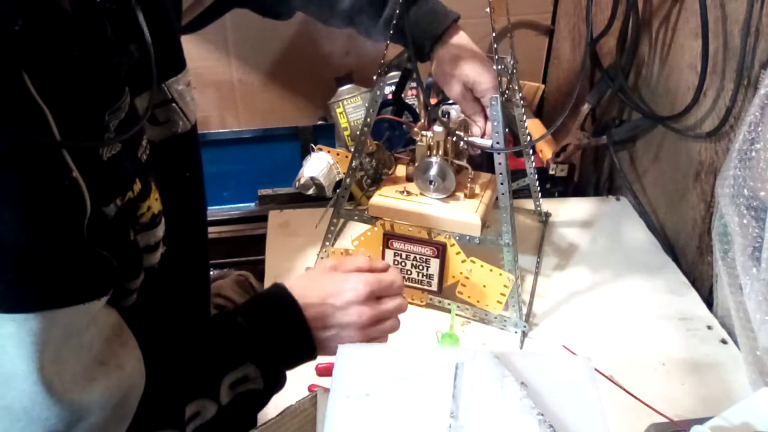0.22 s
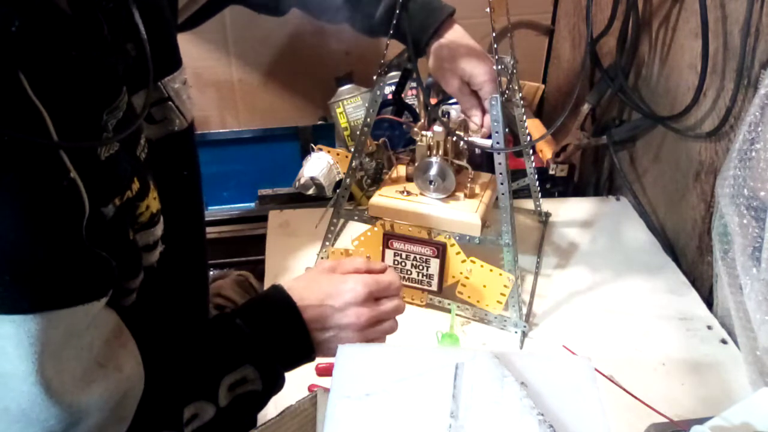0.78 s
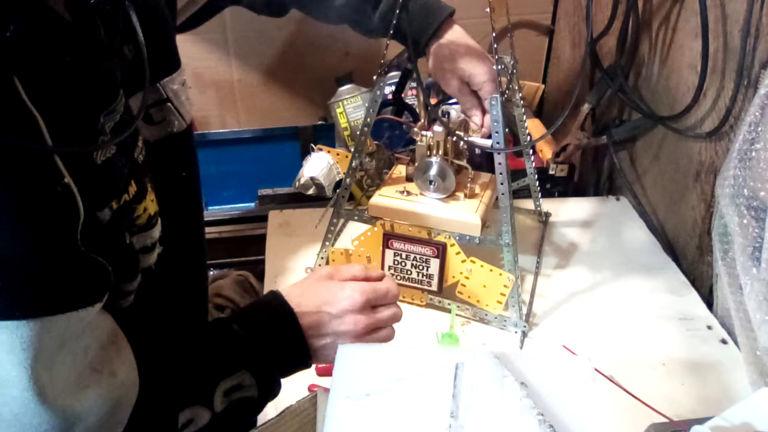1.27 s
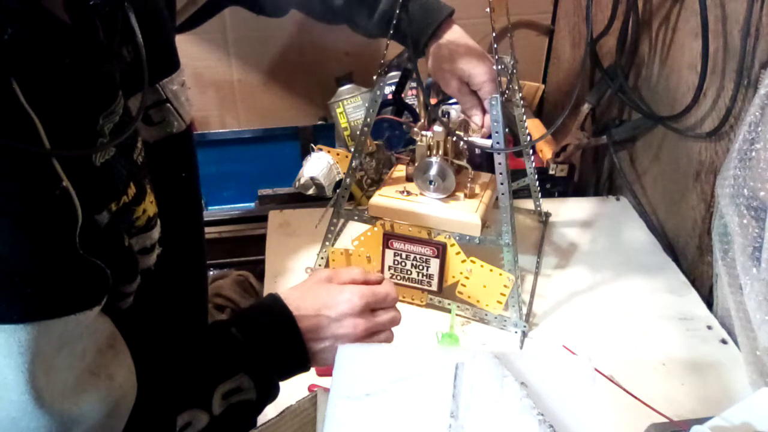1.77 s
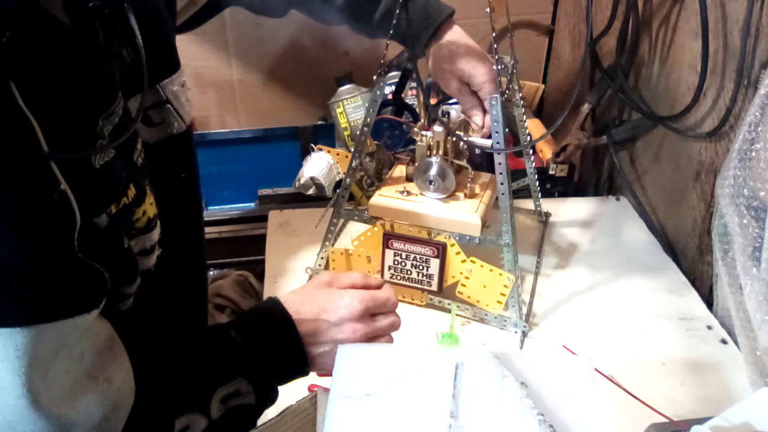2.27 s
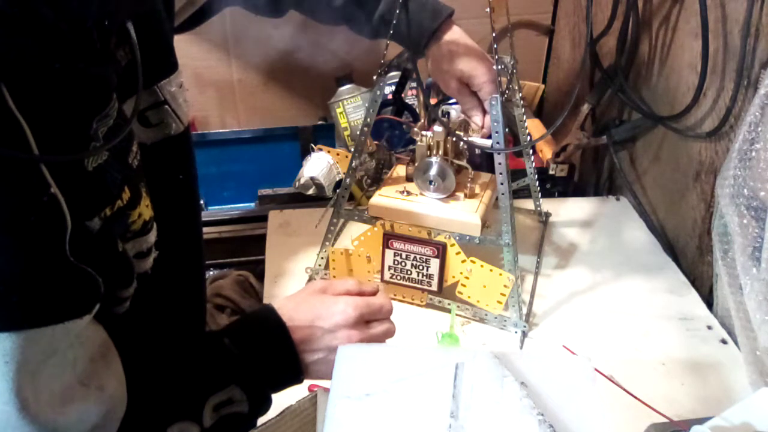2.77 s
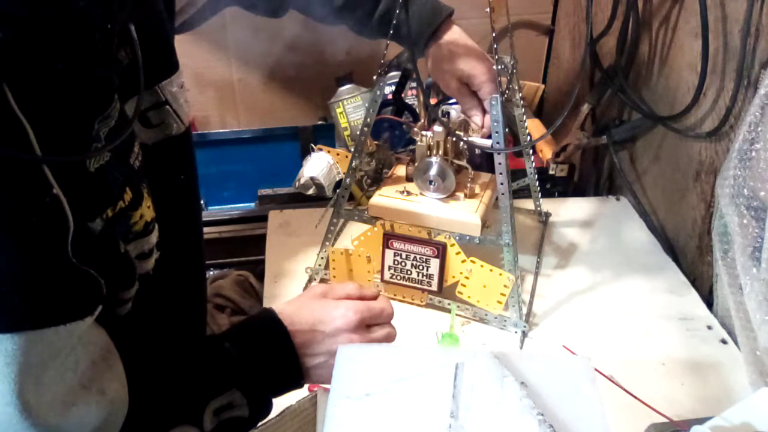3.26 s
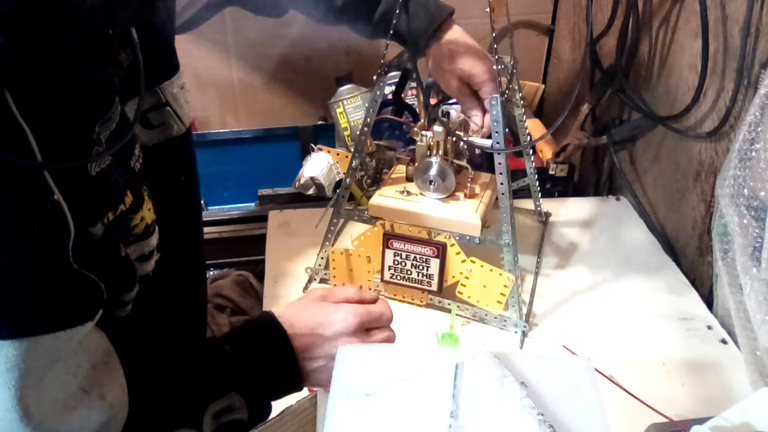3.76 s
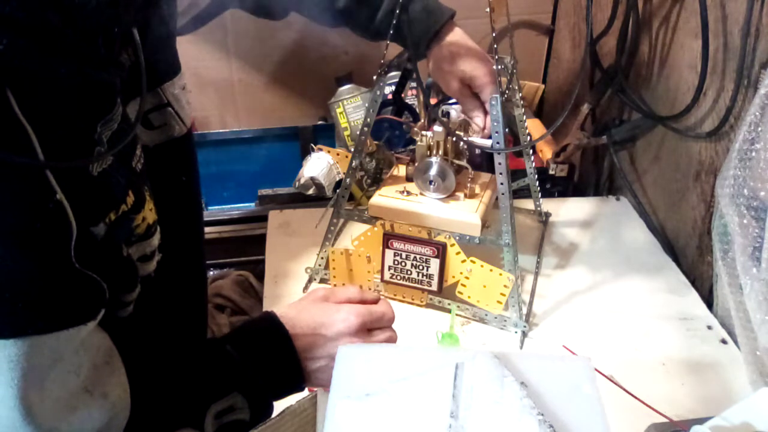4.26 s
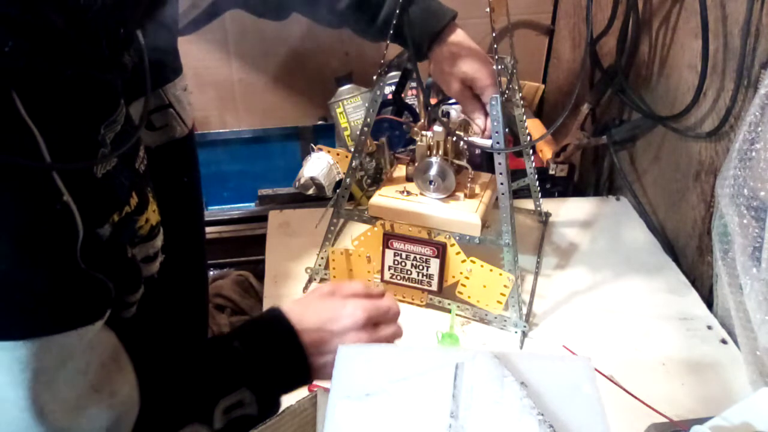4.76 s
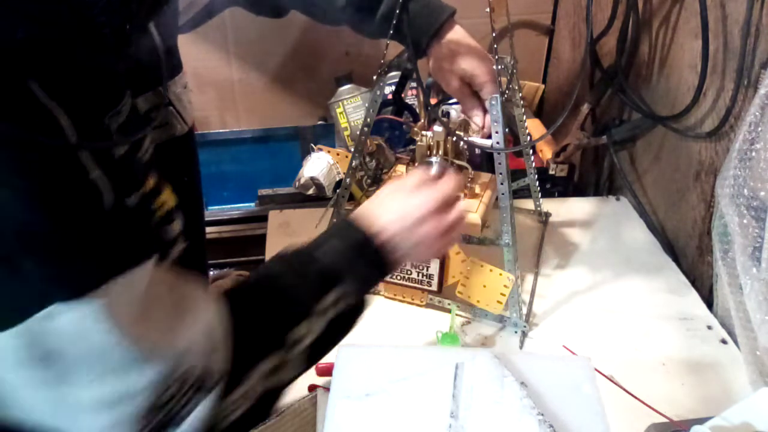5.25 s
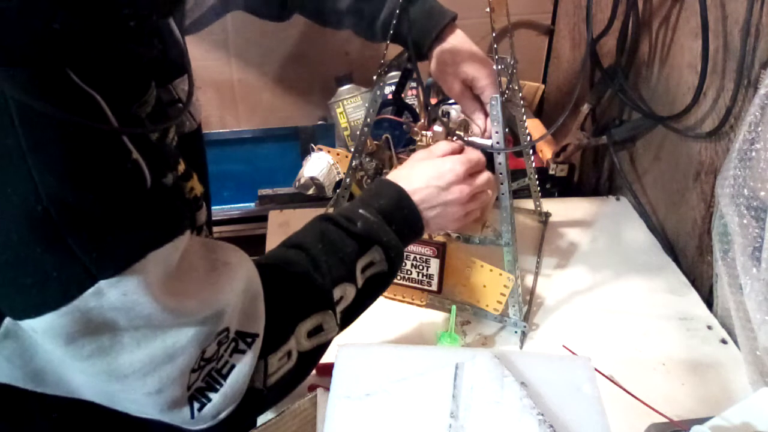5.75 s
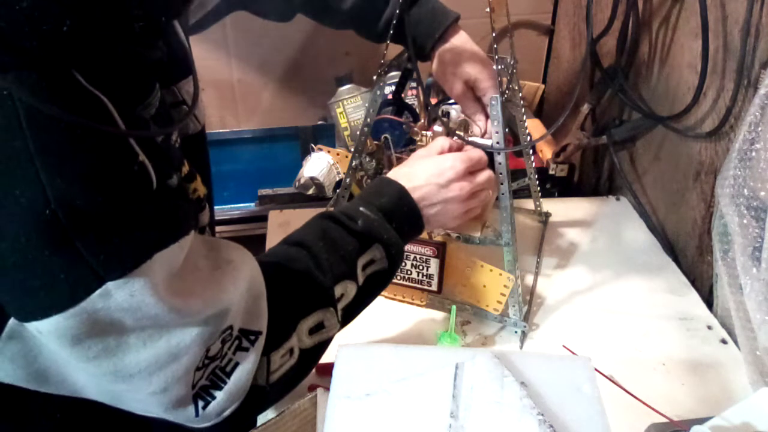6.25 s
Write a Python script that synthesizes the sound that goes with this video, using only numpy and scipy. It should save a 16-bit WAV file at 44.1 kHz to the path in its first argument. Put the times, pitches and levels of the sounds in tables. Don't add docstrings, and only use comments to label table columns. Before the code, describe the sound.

A tiny single-cylinder engine pops unevenly with sharp exhaust cracks and ticking valves, speeding up, slowing to sparse puffs, then firing again in a cluttered shed.

```python
import sys
import numpy as np
from scipy import signal
from scipy.fft import rfft, irfft
from scipy.io import wavfile
from scipy.ndimage import uniform_filter1d

SR = 44100
rng = np.random.default_rng(int(sys.argv[2]) if len(sys.argv) > 2 else 0)


def to_wav(sig):
    pcm = np.clip(np.atleast_2d(sig), -1, 1) * 32767
    pcm = np.round(pcm).astype(np.int16)
    wavfile.write(sys.argv[1], SR, pcm.T)


def volts_from_db(level):
    exponent = np.asarray(level, float) / 20
    return 10 ** exponent


N = 287091
FULL_SPEED = 28


def rms_one(x):
    return x / np.sqrt(np.mean(x ** 2) + 1e-20)


def coloured(points, size):
    hz = np.arange(1, size // 2 + 2) * SR / size
    point_hz, point_db = np.transpose(points)
    db = np.interp(np.log(hz), np.log(point_hz), point_db, -90, -90)
    return rms_one(irfft(rfft(rng.standard_normal(size)) * volts_from_db(db), size))


def resonance(x, hz, width_hz):
    r = np.exp(-np.pi * width_hz / SR)
    poles = [1, -2 * r * np.cos(2 * np.pi * hz / SR), r * r]
    return signal.lfilter([(1 - r * r) / 2, 0, (r * r - 1) / 2], poles, x)


def lowpass(x, order, hz, kind="low"):
    return signal.sosfilt(signal.butter(order, hz, kind, fs=SR, output="sos"), x)


def decay(t, t60):
    return np.exp(-np.log(1000) * np.maximum(t, 0) / t60)


def ring(t, hz, t60, rise_s):
    t = np.maximum(t, 0)
    return np.sin(2 * np.pi * hz * t) * decay(t, t60) * (1 - np.exp(-t / rise_s))


def modes(t, table, rise_s, pitch=1):
    return sum(volts_from_db(db) * ring(t, hz * pitch, t60, rise_s) for hz, db, t60 in table)


def detune():
    return 1 + .0025 * rng.standard_normal()


# delay_s, level_db
ECHOES = [(.0049, -3.5), (.0098, -4.5), (.0147, -31)]
# delay_s, level_db
SLAPS = [(.0050, -8.5), (.00695, -5), (.0089, -18), (.0117, -16)]


def shed(x):
    t = np.arange(12000) / SR
    tail = rng.standard_normal(len(t)) * decay(t, 0.44) * np.minimum(t / 0.03, 1)
    answer = volts_from_db(-21.5) * rms_one(tail) / np.sqrt(len(t))
    for echoes, kind in ((ECHOES, "low"), (SLAPS, "high")):
        clicks = np.zeros(len(t))
        for delay_s, db in echoes:
            clicks[round(delay_s * SR)] = volts_from_db(db)
        answer += signal.lfilter(*signal.butter(1, 1300, kind, fs=SR), clicks)
    answer = signal.lfilter(*signal.butter(1, 3500, fs=SR), answer)
    return x + signal.fftconvolve(x, answer)[:N]


# time_s, speed in cycles per s
SPEED = [(0, 20.145), (.352, 17.755), (1.196, 22.318), (1.539, 24.654), (1.8, 26.063), (2.443, 28.261),
         (2.906, 26.929), (3.463, 27.658), (3.647, 25.759), (4.422, 22.352), (4.958, 22.921),
         (5.741, 12.603), (5.825, 11.649), (6.51, 15.245)]


def flywheel_speed(s):
    return np.interp(s, *np.transpose(SPEED))


# start_s, end_s
FLOODED = [(.09, .19), (.29, .34), (.66, .70), (.99, 1.03), (4.77, 4.81), (5.07, 5.85), (6.28, 6.33)]
# start_s, end_s
CLEAN = [(1.96, 2.1), (2.175, 2.24), (2.81, 2.98), (3.63, 3.74), (4.64, 4.72)]


def timing():
    push, push_kept = 20.357, .4402
    blast_early_s = .00056
    rows, s, ripple, fired = [], .01484, 0, False
    for _ in range(149):
        clean = any(a < s < b for a, b in CLEAN)
        flooded = any(a < s < b for a, b in FLOODED)
        fired = clean or not (fired or flooded)
        speed = flywheel_speed(s)
        rows.append((s - blast_early_s * fired, speed, fired))
        ripple = push_kept * ripple + push * fired / speed
        s += 1 / (speed + ripple)
    return np.transpose(rows)


CRANK_DB = [-67, -53.5, -55.5, -44, -47]


def crank(t):
    starts = timing()[0]
    turn = np.interp(t, starts, np.arange(len(starts)))
    speed = uniform_filter1d(np.gradient(turn) * SR, size=4000) / FULL_SPEED
    orders = enumerate(CRANK_DB, 2)
    return speed ** 2 * sum(volts_from_db(db) * np.sin(2 * np.pi * (k * turn + rng.random())) for k, db in orders)


# hz, level_db per Hz
BENCH = [(18, -45), (30, -20), (60, 9.5), (86, 5.5), (164, 2.5), (225, -8), (317, 0), (504, -9), (590, 6),
         (700, -46), (910, -53), (1540, -120)]


def bench_rumble(t):
    wobble = np.exp(-((flywheel_speed(t) - 22.35) / 4.8) ** 2)
    return volts_from_db(-45.5 + 3.5 * wobble + 2.5) * coloured(BENCH, N)


# pitch_hz, level_db, t60_s
KICK = [(74, -31.5, 0.1), (99.6, -13.5, 0.073), (150.3, -16.5, 0.097)]


def bench_kick(t, thump_db):
    return volts_from_db(thump_db + 5.5) * modes(t, KICK, 0.0023)


# time_s, level_db
DRAUGHT = [(0, 4.5), (.5, 1.7), (1.2, 0.8), (2.5, -0.3), (3.5, 0.8), (3.7, -4), (4.0, 1.5), (4.45, -1),
           (4.9, -0.2), (5.2, 0.5), (5.7, -2.5), (6.51, -1.5)]


def draught_db(s):
    return np.interp(s, *np.transpose(DRAUGHT))


# hz, level_db per Hz
WHIRR = [(530, -4), (900, 8), (1590, -14.5), (1720, -2), (2300, -6), (2630, -3), (3040, -4.5),
         (4150, -12.5), (5410, -19), (7490, -20.5), (8150, -48), (12000, -40), (15500, -24), (16500, -47)]


def running_noise(t, flow):
    db = -38 + 13 * np.log2(flywheel_speed(t) / FULL_SPEED) + 0.89 * draught_db(t)
    whirr = coloured(WHIRR, N)
    return volts_from_db(db) * whirr + flow * lowpass(whirr, 4, 9500)


def valve_flow(t, length, shuts, clack_db):
    return volts_from_db(clack_db - 3.5) * (t < length) * decay(t, 0.17) * decay(t - shuts, 0.0045)


def intake_pipe(t, opens, shuts, intake_db, fired):
    hz, rise_s = (820, .007) if fired else (847, .0018)
    pipe = ring(t - opens, hz * detune(), 0.073, rise_s) * decay(t - shuts, 0.11)
    return volts_from_db(intake_db + 14.0) * pipe


# pitch_hz, width_hz, level_db
VALVE = [(2050, 55, -21), (3690, 220, 1.5), (5270, 180, 4.5), (5320, 120, -2), (6700, 370, -4),
         (540, 47, -10), (9460, 1100, -22)]


def valve_gear(rattle):
    knocks = lowpass(rattle * rng.standard_normal(N), 6, 10800)
    return volts_from_db(10.0) * sum(volts_from_db(db) * resonance(knocks, hz, width) for hz, width, db in VALVE)


def rattle_swell(t, clack_db, fired):
    chatter = 0.43 * decay(t, 0.0066) + 0.47 * decay(t, 0.086)
    return volts_from_db(clack_db + (-3.0 if fired else 3.0)) * (t > 0) * chatter


# pitch_hz, level_db, t60_s
ROCKER = [(5520, 4, 0.03), (7510, 2.5, 0.018)]


def rocker_arm(t, clack_db):
    return volts_from_db(clack_db + rng.standard_normal()) * modes(t, ROCKER, 0.0024, detune())


# hz, level_db per Hz
JET = [(1470, -16), (2500, -12.5), (2710, 2.5), (3240, -21), (3980, -6), (4810, -6), (5640, -0.5),
       (7860, -13), (8240, -24), (10500, -14), (12700, -11.5), (15200, -17), (16500, -26)]
# pitch_hz, width_hz, level_db
JET_RINGS = [(5420, 27, 5.5), (5744, 17, -52), (10290, 2600, 15.5), (15350, 1300, 19)]


def jet_noise():
    gusts = rms_one(signal.lfilter([1], [1, -.97], rng.standard_normal(N)))
    gas = coloured(JET, N) * volts_from_db(1.96 * gusts)
    gas = rms_one(gas + sum(volts_from_db(db) * resonance(gas, hz, width) for hz, width, db in JET_RINGS))
    low, under = (signal.sosfiltfilt(signal.butter(2, hz, fs=SR, output="sos"), gas) for hz in (4500, 8200))
    return np.array([low, under - low, gas - under])


SOFT_JET_DB = [5.5, -19, -33]
WARM_DB = [-1.5, -3.5, 0.5]


def jet_swell(t, length, clack, hiss_db, fired, warm):
    top_db = 6 * np.log2(length * FULL_SPEED)
    spit_db = np.c_[[1.8, 2.1, 2.8]] * rng.standard_normal((3, 1))
    db = hiss_db + 3.5 + spit_db + np.c_[[0, 0, fired * top_db]]
    db = db + (1.5 - fired) * np.c_[SOFT_JET_DB] + warm * np.c_[WARM_DB]
    stages = decay(t - .006, 0.012) + 0.31 * decay(t, np.c_[[.09, .1, .06]])
    blow = volts_from_db(db) * stages * (1 - np.exp(-t / (.0003 if fired else .004)))
    leak_db = np.c_[[-51, -54, -58]] + 2 * top_db + 2 * rng.standard_normal()
    leak = volts_from_db(leak_db) * decay(t - clack, 0.1) * np.clip((t - clack) / 0.012, 0, 1)
    return blow + warm * (1 - fired) * leak


# pitch_hz, level_db, t60_s
HEAD = [(5540, -1, 0.035), (5526, -10.5, 0.016)]


def cylinder_head(t, hiss_db):
    return volts_from_db(hiss_db + 3.8 * rng.standard_normal()) * modes(t, HEAD, 0.00027, detune())


# pitch_hz, level_db, t60_s
BOOM = [(619.8, -1, 0.036), (745, -8, 0.25), (846.7, -4.5, 0.16)]


def cylinder_boom(t, length, thump_db):
    gain = volts_from_db(thump_db) * (length / 0.032) ** 1.8
    return gain * modes(t, BOOM, 0.011) * decay(t - 0.71 * length, 0.046)


def exhaust_port(t, clack, port_db, fired):
    hz, t60, rise_s = (2659, 0.021, .0003) if fired else (2590, 0.038, .0012)
    port = ring(t, hz * (1 + 0.0045 * rng.standard_normal()), t60, rise_s)
    return volts_from_db(port_db + 11.0) * port * decay(t - clack, 0.074)


# pitch_hz, fired_db, misfired_db, t60_s
EXHAUST = [(317, -32, -20, 0.11), (348.2, -8, -11, 0.1), (496, -38.5, 2, 0.0077), (518.4, -6, -11, 0.036),
           (574, 1, 3.5, 0.019), (749, -11, -54, 0.098), (819, -6.5, -22, 0.028), (960, 9.5, -18, 0.0066),
           (1060, -11.5, -16, 0.043), (1245.5, -15, -8, 0.084), (1724, -4, -56, 0.026),
           (1876, -13, -40, 0.081), (3482, -7, -6.5, 0.019)]


def exhaust_body(t, length, thump_db, fired):
    stretch = (length / 0.24) ** 0.07
    rise_s = .0003 if fired else .0004
    body = 0
    for hz, hot_db, cold_db, t60 in EXHAUST:
        db = (hot_db if fired else cold_db) + 1.0 * rng.standard_normal()
        body = body + volts_from_db(db) * ring(t, hz * detune(), t60 * stretch, rise_s)
    return volts_from_db(thump_db + 4.0) * body


# full_speed_db, lost_at_half_speed_db, spread_db
FIRED = [
    (-17.5, 4, 0.1),
    (-21, 4, 0.5),
    (-23, 8.5, 1.4),
    (-27.5, 0.5, 4.5),
    (-31.5, 10, 2.5),
]
# full_speed_db, lost_at_half_speed_db, spread_db
MISFIRED = [
    (-28.5, 1.5, 3.6),
    (-33.5, -2, 1.7),
    (-45, -2, 1.8),
    (-34, 1, 1.2),
    (-36.5, 19.5, 0.42),
]
# start_s, thump_db, port_ring_db, jet_hiss_db
ODD = [(.015, -0.5, 0.5, 7), (.479, -0.5, 4.5, 0), (.582, 0.5, 5.5, -6), (.732, -1.5, 3.5, 0),
       (1.236, 2, -3.5, 3), (1.484, 1, 4, -1.5), (1.564, .5, -1.5, -6.5), (1.72, -1, -27, 3),
       (1.979, -6, -0.5, -20), (2.051, -1.5, 3.5, 1), (2.158, .5, -2, -3), (2.193, -5, -7, -15),
       (2.229, 0, -17, 3), (2.368, 0, -3.5, 0), (2.648, -0.5, 3.5, 0.5), (2.718, -0.5, 1.5, 1),
       (2.895, 0.5, 0.5, -2), (3.181, -1, -1, .5), (3.394, -2.5, 2, 0.5), (3.466, -2, 3, -2),
       (3.608, 1, 5, 4.5), (3.647, -10, -.5, -12), (3.797, -1.5, -34, 2.5), (4.194, -.5, 2, 1.5),
       (4.278, 1, -4, 4), (4.364, -1, 1.5, 5.5), (4.663, 2, -4.5, 4), (4.705, 2, 1, 5), (4.833, -1, -4, 1),
       (5.002, .5, -18, 7)]


def cycles():
    s, speed, fired = timing()
    hot, cold = np.transpose(FIRED)[..., None], np.transpose(MISFIRED)[..., None]
    full_db, half_db, spread_db = np.where(fired, hot, cold)
    chance = spread_db * rng.standard_normal((5, len(s)))
    for when, *extra_db in ODD:
        chance[:3, np.argmin(abs(s - when))] = extra_db
    db = full_db + half_db * np.log2(speed / FULL_SPEED) + chance
    db[-1] += draught_db(s)
    db[0] += 0.28 * (1 - fired) * draught_db(s)
    return np.vstack([s, db, fired]).T


def engine():
    rows = cycles()
    lengths = np.diff(rows[:, 0], append=rows[-1, 0] + 0.083)
    after_firing = np.roll(rows[:, -1], 1)
    t = np.arange(4000) / SR
    tones, intake, rattle, flow, kick = np.zeros((5, N + 8000))
    jet = np.zeros((3, N + 8000))
    for row, length, warm in zip(rows, lengths, after_firing):
        s, thump_db, port_db, hiss_db, clack_db, intake_db, fired = row
        clack = 0.23 * length
        opens = 0 if fired else 0.25 * length
        shuts = (0.94 if fired else 0.58) * length
        span = slice(round(s * SR), round(s * SR) + len(t))
        tones[span] += exhaust_body(t, length, thump_db, fired) + exhaust_port(t, clack, port_db, fired)
        tones[span] += cylinder_head(t, hiss_db) + fired * cylinder_boom(t, length, thump_db)
        tones[span] += rocker_arm(t - clack, clack_db)
        intake[span] += intake_pipe(t, opens, shuts, intake_db, fired)
        kick[span] += bench_kick(t, thump_db)
        jet[:, span] += jet_swell(t, length, clack, hiss_db, fired, warm)
        rattle[span] += rattle_swell(t - clack, clack_db, fired)
        flow[span] += valve_flow(t, length, shuts, clack_db)
    return tones[:N], intake[:N], jet[:, :N], rattle[:N], flow[:N], kick[:N]


def scene():
    tones, intake, jet, rattle, flow, kick = engine()
    t = np.arange(N) / SR
    bench = bench_rumble(t) + crank(t) + kick
    near = tones + 0.93 * intake + np.sum(jet * jet_noise(), axis=0) + valve_gear(rattle)
    near = lowpass(near, 6, 265, "high")
    return (volts_from_db(-2.0) * shed(near) + 1.95 * intake + bench + running_noise(t, flow))[None]


def roll_off(x):
    return signal.sosfilt(signal.butter(12, 16990, fs=SR, output="sos"), x)


def record(dry):
    x = lowpass(dry, 2, 52, "high")
    x = lowpass(x, 10, 15900)
    return roll_off(1.205 * np.tanh(x / 1.187))


dry = scene()
out = record(dry)
to_wav(out)
```